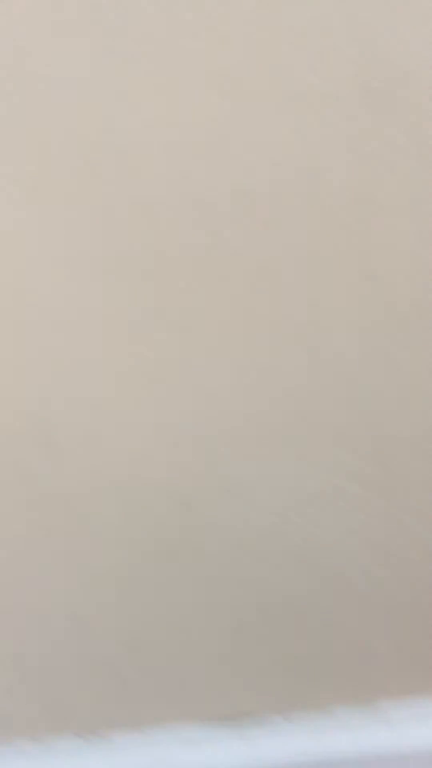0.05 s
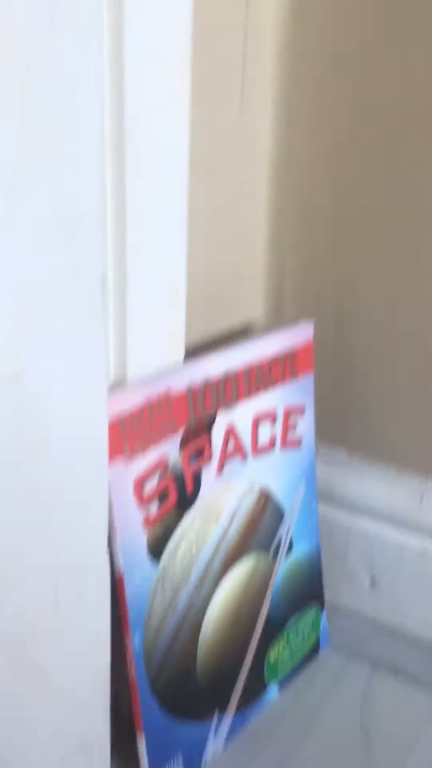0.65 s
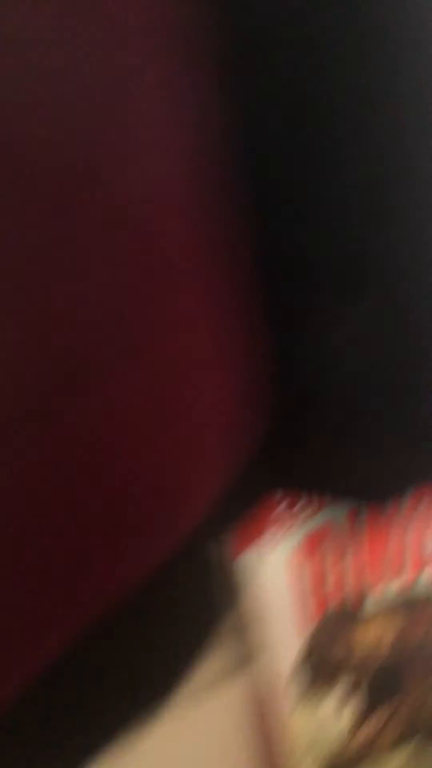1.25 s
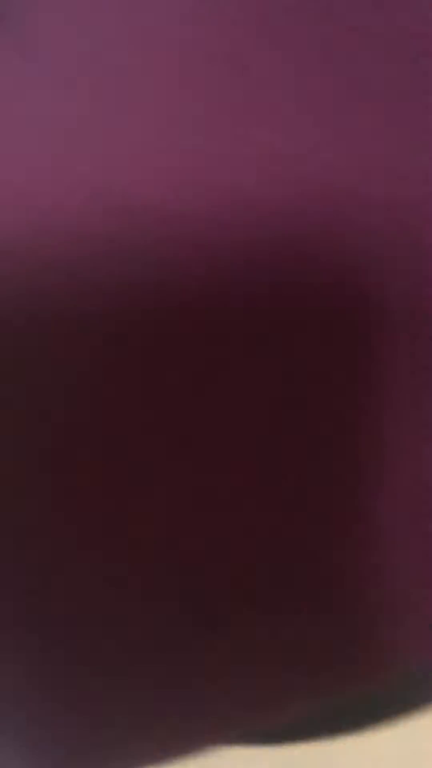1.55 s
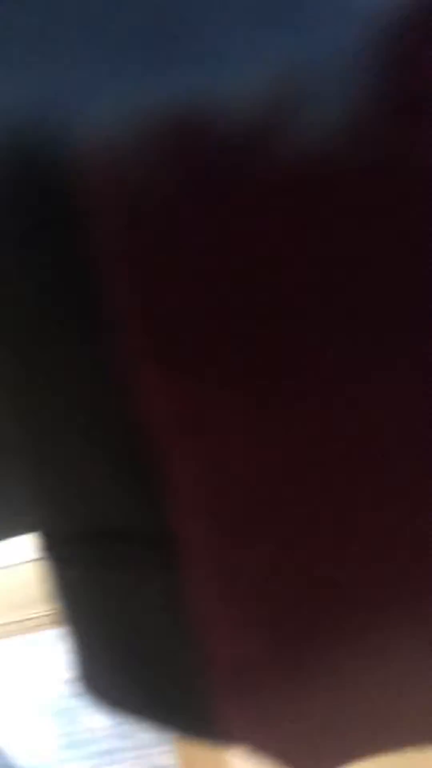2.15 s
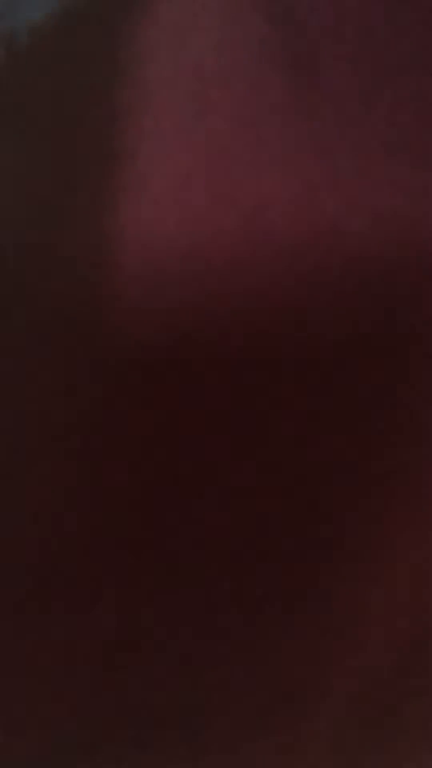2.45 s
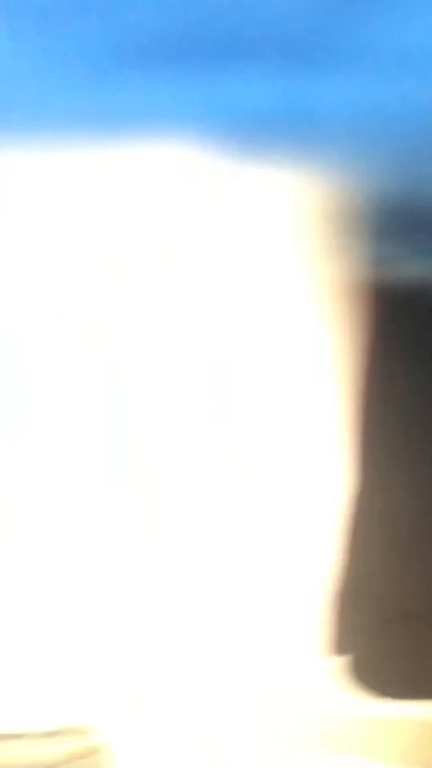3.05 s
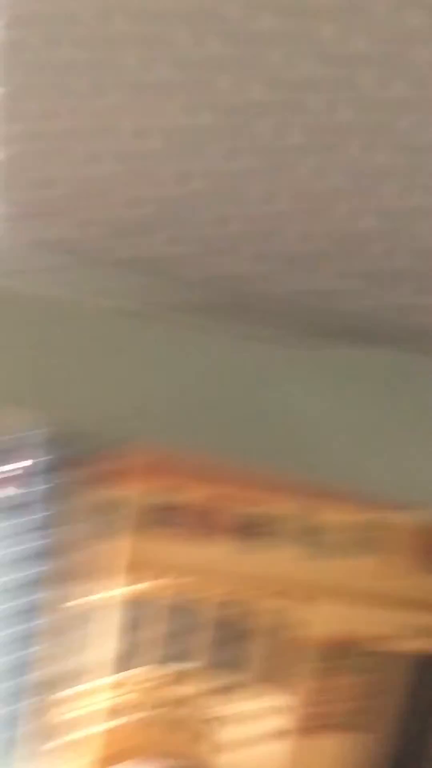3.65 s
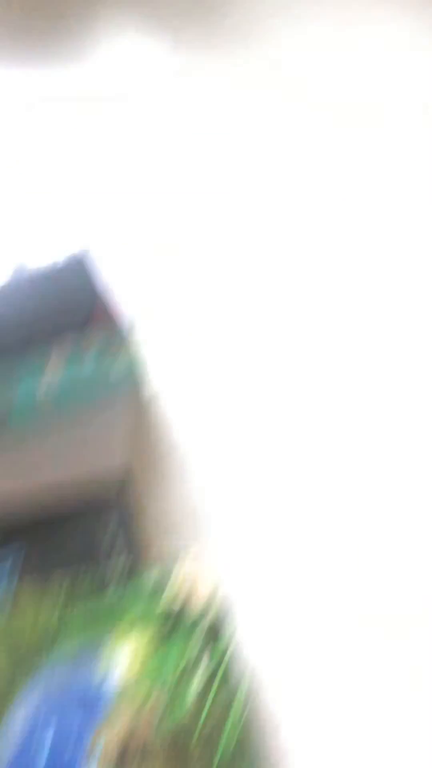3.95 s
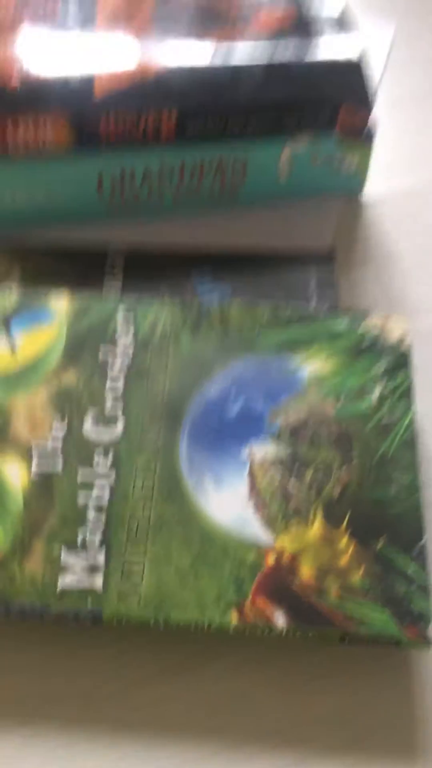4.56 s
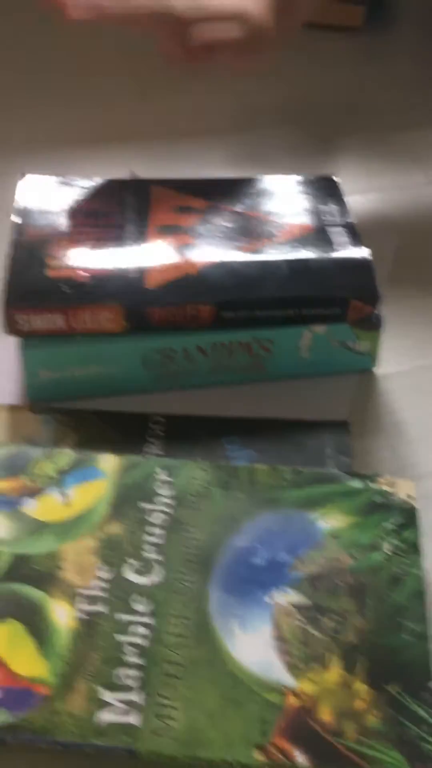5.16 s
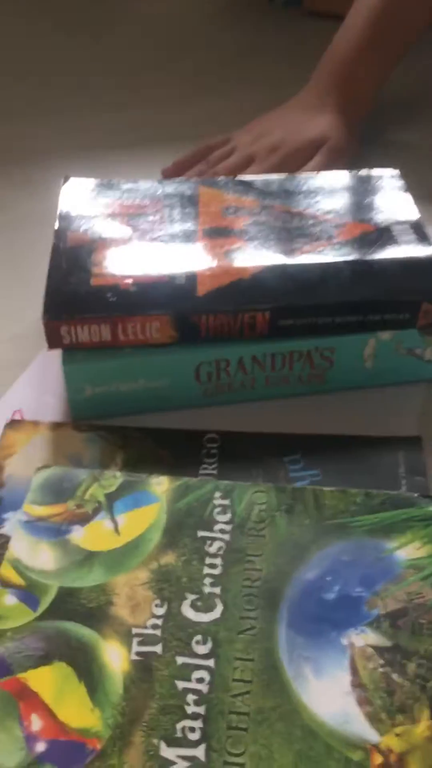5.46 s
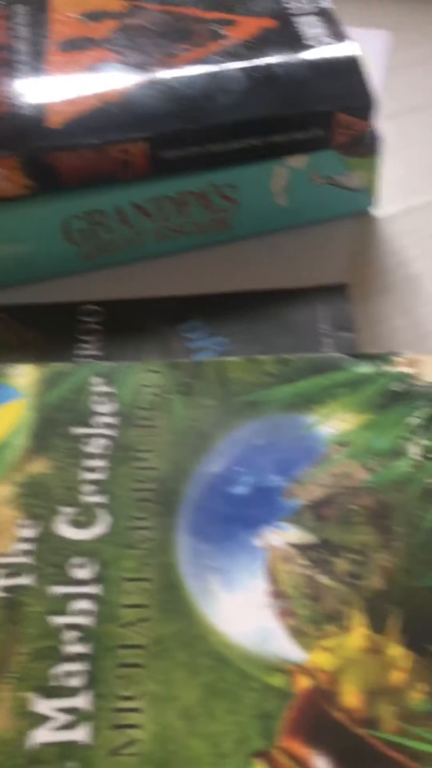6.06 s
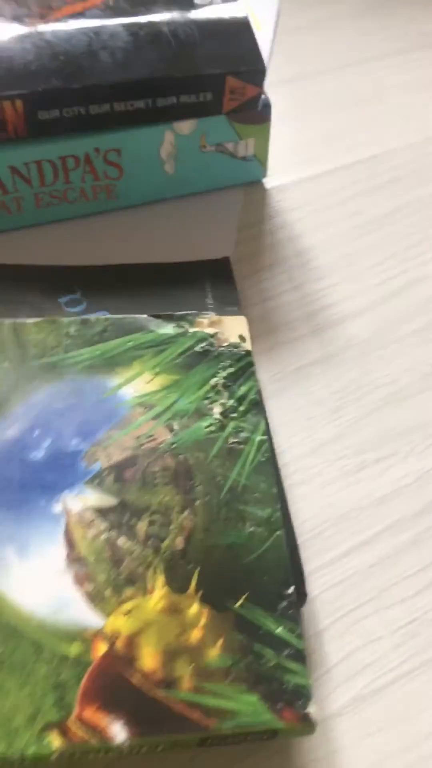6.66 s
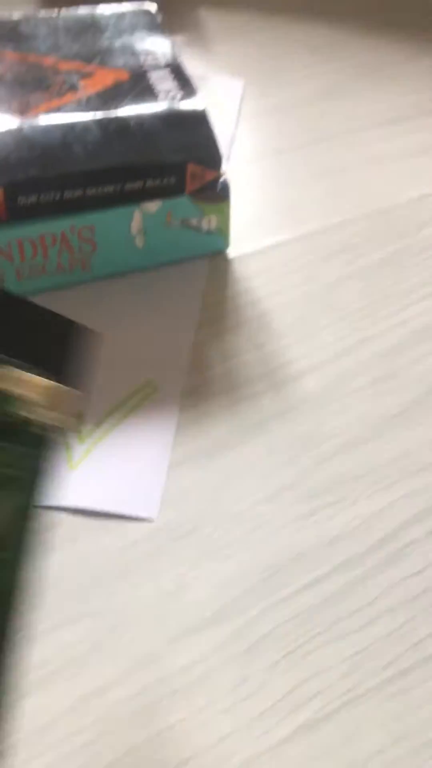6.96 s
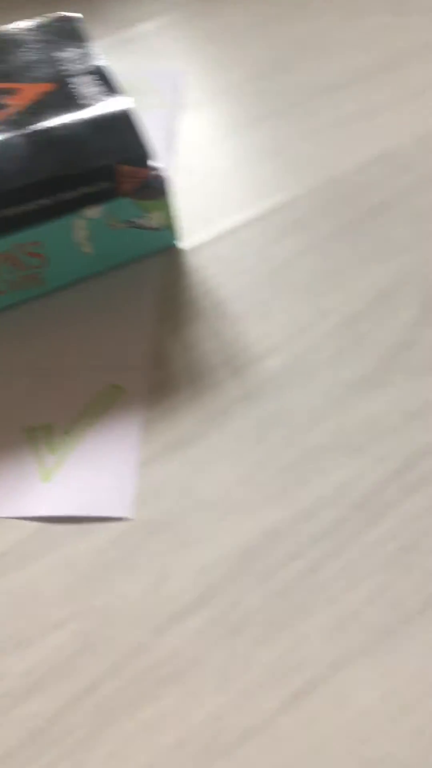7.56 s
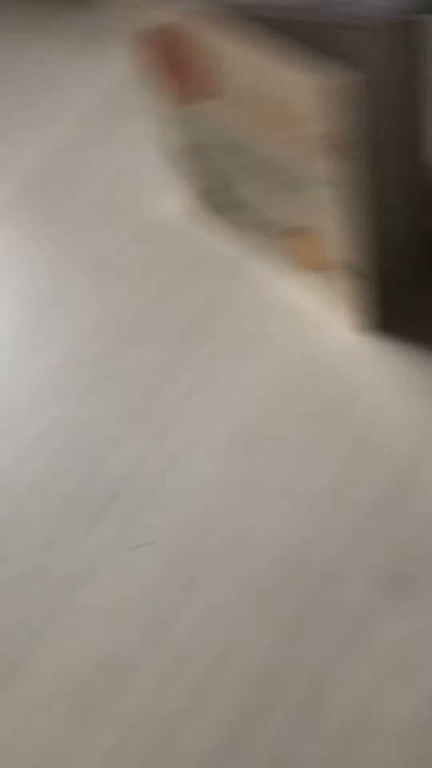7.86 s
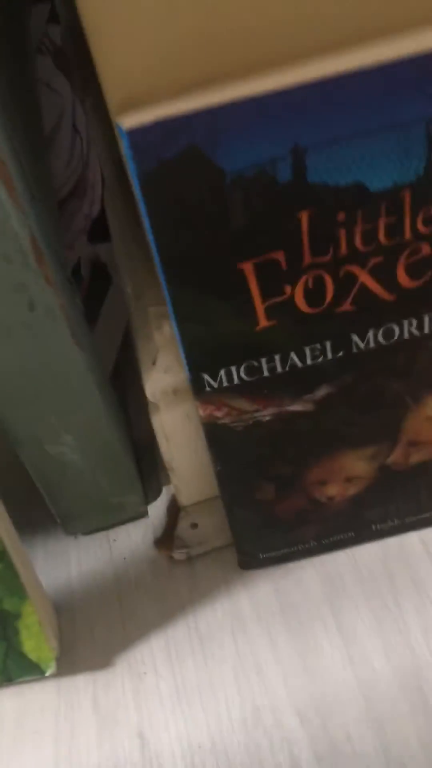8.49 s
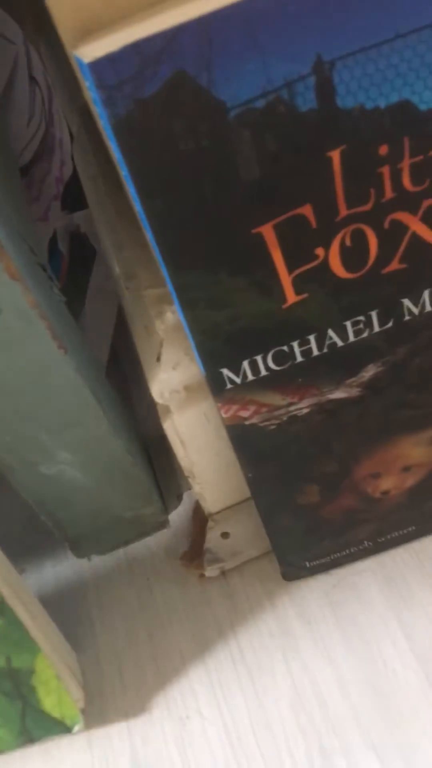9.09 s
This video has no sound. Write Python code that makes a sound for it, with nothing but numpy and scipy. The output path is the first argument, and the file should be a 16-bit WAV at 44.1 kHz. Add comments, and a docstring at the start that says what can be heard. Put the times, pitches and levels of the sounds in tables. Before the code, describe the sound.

Scattered soft thuds, knocks and ticks of someone walking about and moving paperbacks indoors, over faint rustling and handling rumble.

```python
"""Paperbacks in a small room

Someone walks about with a hand-held phone and handles paperbacks on the floor. Steps and bumps thud,
covers slap and tick, a fingertip squeaks by stick-slip. Close to the microphone, clothes rustle and the
hand rubs the case. The room answers briefly and booms in its low modes, over a faint hiss."""
import sys
import numpy as np
from scipy import signal
from scipy.fft import rfft, irfft, next_fast_len
from scipy.io import wavfile
from scipy.ndimage import uniform_filter1d, map_coordinates

SR = 44100
rng = np.random.default_rng(int(sys.argv[2]) if len(sys.argv) > 2 else 0)


def inscribe(sig):
    """Save sig as 16-bit PCM at rate SR to the path in sys.argv[1].

    A 1-D sig is mono; a 2-D sig holds one channel per row.
    Samples are clipped to [-1, 1] before scaling.
    """
    pcm = np.round(np.clip(np.atleast_2d(sig).T, -1, 1) * 32767)
    wavfile.write(sys.argv[1], SR, pcm.astype(np.int16))


N = 411453

# noise spectra (frequency [Hz], relative density [dB])
HISS_SPECTRUM = [(30, -1), (60, 4.5), (150, 7), (500, -36), (2000, -51), (8000, -42), (16000, -21)]
RUMBLE_SPECTRUM = [(13, -52), (22, -7), (42, -1.5), (60, 5.5), (119, -10), (150, -6.5), (193, -11.5),
                   (225, -7.5), (284, -14.5), (443, -26), (600, -20.5), (780, -29), (1320, -120)]
RUB_SPECTRUM = [(180, -57), (300, 2), (571, -2), (800, -2.5), (928, -1), (1030, -5), (2010, -7.5),
                (2810, -11.5), (3200, -9.5), (4160, -34), (7040, -120)]
CLOTH_SPECTRUM = [(1180, -46), (2000, -1.5), (2510, -3), (2740, -8), (3340, 0.5), (4450, 1.5), (4940, -2),
                  (6140, 1), (7840, -4.5), (9250, -2.5), (10300, -10), (11400, -6), (15100, -10.5),
                  (16000, -17)]
# grip rumble; arm and clothes motion (time [s], relative level [dB])
RUMBLE_ENVELOPE = [(0, -54.5), (.3, -59.5), (.48, -49), (.63, -49), (.7, -59.5), (1.08, -55), (1.58, -53.5),
                   (1.7, -58.5), (2.2, -60.5), (2.86, -62.5), (3.4, -56.5), (3.56, -50), (3.9, -49.5),
                   (4.1, -59), (4.75, -60.5), (4.95, -65), (5.6, -60), (6.5, -63), (6.7, -52), (6.85, -64),
                   (8.3, -62), (8.5, -57), (8.8, -64), (9.17, -50), (9.33, -59)]
MOTION_ENVELOPE = [(0, -69.5), (.16, -62.5), (.3, -64.5), (.43, -59), (.63, -68), (.68, -72.5), (.84, -73),
                   (.89, -65), (1.08, -57), (1.23, -66), (1.31, -63.5), (1.58, -64), (1.66, -72.5),
                   (1.84, -76), (2.2, -68), (2.34, -79), (2.5, -73), (2.86, -74.5), (3.05, -66),
                   (3.37, -73), (3.56, -61), (4.17, -63), (4.45, -71), (5.1, -75), (6.23, -75.5),
                   (6.41, -56.5), (6.55, -73), (6.7, -63.5), (6.83, -61.5), (6.94, -68.5), (7.11, -61.5),
                   (7.25, -66.5), (7.62, -62), (8.1, -62.5), (8.3, -69), (8.39, -61.5), (8.5, -71),
                   (9.05, -68), (9.33, -75)]
# phone case resonances (frequency [Hz], width [Hz], gain [ratio])
CASE_MODES = [(3620, 350, 0.11), (5950, 18, 0.45), (6630, 37, 0.21), (7000, 98, 0.13), (9760, 60, 0.17)]
# steps and books landing, levels relative (time [s], thud [dB], thud pitch [Hz], boom [dB], crack [dB],
# brightness [dB/octave], clack [dB], room [dB])
IMPACTS = [(0.039, -39.5, 183, -65, -71, -8, 0, 1.5), (0.066, -39, 440, -63, -68, -7, 9, 0.5),
           (.495, -10, 170, -24.5, -32, -7, 9, -13), (.5, -13.5, 307, -55, -45, -4, -2, -8),
           (.536, -20.5, 181, -27.5, -70, -6, -1, -6.5), (1.714, -46, 248, -46.5, -68.5, -23, -5.5, -2.5),
           (1.868, -41, 233, -40, -51, -8, -10, 4), (1.873, -22, 654, -69, -39, -5, 6.5, -4),
           (1.986, -30, 214, -37, -40, 2.6, -0.5, -3.5), (2.25, -46.5, 249, -45.5, -65.5, -3, -1, -5.5),
           (2.395, -49, 318, -68, -59.5, -3.5, -2.5, -5.5), (2.521, -48, 194, -71.5, -67.5, -2.5, 0, -0.5),
           (3.18, -31, 192, -51, -46.5, -7.5, 0.5, -1), (3.25, -34, 189, -40, -55.5, 0, -0.5, 0.5),
           (3.397, -38, 210, -70, -61, 1.9, -5, -8.5), (3.734, -42, 235, -63, -57, -0.7, 1.5, -17),
           (3.801, -28, 218, -36, -55.5, -2, 0, -3), (3.858, -39, 200, -62, -63.5, -8, -4, -24),
           (3.901, -41, 224, -58, -63, -8, 0, -15), (3.992, -31, 164, -67, -56.5, 0.5, -7, -9.5),
           (4.203, -29, 254, -62, -55.5, -4, 0.5, -4), (4.535, -27, 290, -59, -54, -0.5, -1, -5.5),
           (4.549, -24.5, 244, -43, -51, -0.3, -2, -7.5), (4.691, -46.5, 262, -59, -74, 1, -7, -4.5),
           (5.249, -25.5, 274, -33, -36.5, 0, 2.5, -2.5), (5.254, -24.5, 500, -58, -56.5, -4, -2, -2),
           (5.472, -38.5, 243, -68, -75, -6, -7.5, -16), (6.255, -38.5, 303, -72, -57, -2.5, -4.5, -10.5),
           (6.262, -34, 253, -58, -58, -2.5, -4, -9), (6.306, -34.5, 203, -53, -48, -1.8, 1, -13.5),
           (6.334, -35.5, 375, -70, -61, -8, 3, -22), (6.344, -31.5, 292, -65, -49.5, -3, -3, -9),
           (6.433, -32.5, 244, -78, -53.5, -0.5, 3, -15.5), (6.593, -32, 354, -68, -40, -1.6, 11, -15),
           (6.797, -25.5, 353, -50, -45.5, -4, -6, -10.5), (7.424, -13, 233, -35, -40, -11.5, 0, -10),
           (7.509, -35.5, 534, -65, -68, 1.5, -10, -16), (7.649, -42, 530, -75, -82, -3.5, -11, -10),
           (7.693, -42, 520, -67, -52, 1.6, 2.5, -11.5), (7.749, -55, 490, -74, -51.5, -2.2, 2, -7),
           (7.781, -43.5, 266, -62, -73, 5, -4, 3), (8.892, -18, 199, -45, -55.5, -7.5, 0, -6.5),
           (8.987, -37, 159, -73, -62, -6, 6, -0.5), (9.245, -32.5, 198, -66, -57.5, -1.5, -3.5, -3.5),
           (9.256, -29.5, 255, -63, -64, 1.5, -4.5, -8)]
# covers and page edges, no thud (time [s], crack [dB], brightness [dB/octave], clack [dB], room [dB])
COVER_TICKS = [(0.089, -59.5, -3.5, 2, -10), (0.504, -42, -2.5, 0.5, -13), (1.263, -62, -0.5, 0, -6.5),
               (1.982, -48.5, -4.5, 1, 2), (3.275, -54.5, -6, -3, 2.5), (3.33, -67, 2, 5, -7.5),
               (4.375, -61, 1, 1.5, -8), (4.955, -70, 4.5, -3, -12.5), (5.184, -68, -4.5, -5, 3.5),
               (5.246, -46.5, -4, -12.5, -4), (5.927, -76, 2.5, 3, -6.5), (6.455, -51, 1.3, 1.5, -5.5),
               (7.034, -64.5, -3.5, -2, -10), (7.084, -65.5, 0.5, 3, -5), (7.415, -41, -3.5, 2, -4),
               (8.167, -52, 0, -1, -10.5)]
# modes of floor and room; of boards and covers (frequency [Hz], t60 [s], relative level [dB])
BOOM_MODES = [(63.8, 0.45, -3), (76.6, 0.13, 4), (107.6, 0.33, -5), (171, .28, -6)]
BOARD_MODES = [(350,.12,-10), (533,0.19,-3), (647,0.34,-9.5), (730,0.33,-7), (1770,0.084,-14.5),
               (2160,0.15,-7.5)]
# room tail decay (frequency [Hz], t60 [s])
ROOM_DECAY = [(100, 0.46), (300, 0.28), (1000, 0.24), (3000, 0.26), (7000, 0.3), (14000, 0.23)]
# colour of a plain crack; of the microphone port (frequency [Hz], gain [dB])
CRACK_SPECTRUM = [(60, 28.5), (330, 43.5), (715, 45), (1480, 36), (3440, 37), (5200, 34.5), (8500, 30),
                  (16000, 28.5)]
PORT_RESPONSE = [(330,6), (450,1.5), (750,-0.5), (1050,0), (1800,2), (2300,0), (2850,-3.5), (3700,2),
                 (5200,-1.5), (7000,-0.5), (9900,-1.5), (10500,-6.5), (11600,-3.5), (15000,-9)]
# sleeve, finger and cover strokes (midpoint [s], nominal length [s], centre [Hz], sigma [octaves],
# level [dB])
STROKES = [(0.348,0.13,4400,0.41,-61), (0.45,0.019,1880,0.65,-51), (1.098,0.19,4740,0.4,-63.5),
           (1.418,0.035,10500,.3,-67), (1.558,.09,8500,.35,-68.5), (2.521,0.081,5200,0.48,-69.5),
           (3.042,0.26,4960,0.37,-70.5), (3.562,0.29,4850,0.44,-62.5), (8.217,0.049,6000,0.42,-63),
           (3.762,0.19,1330,0.37,-60), (6.005,0.065,7660,0.52,-69), (6.419,0.16,2410,0.94,-55),
           (6.443,.02,1860,0.81,-40), (6.615,.025,2940,.9,-55.5), (7.149,.07,930,0.14,-60),
           (7.842,.1,885,0.54,-60), (8.658,0.14,3590,0.76,-63.5), (8.721,0.32,1390,0.32,-69)]
# fingertip stick-slip (time [s], slip rate [Hz], level [dB])
FINGER_SLIPS = [(6.84, 390, -68), (6.862, 325, -45.5), (6.876, 400, -47.5), (6.884, 410, -50),
                (6.895, 365, -46), (6.908, 195, -50), (6.92, 120, -53)]

TOP_HZ = 16000


def amp(db):
    """Decibels to gain."""
    return 10 ** (np.asarray(db) / 20)


def unit(x):
    """Scale to rms 1."""
    return x / np.sqrt(np.mean(x ** 2) + 1e-20)


def along(points, hz):
    """Read (frequency, value) points on a log axis."""
    knots_hz, values = np.transpose(points)
    return np.interp(np.log(hz + 1), np.log(knots_hz + 1), values)


def curves(rows):
    """One per-sample curve for each column after time."""
    times_s, *columns = np.transpose(rows)
    return [np.interp(np.arange(N) / SR, times_s, column) for column in columns]


def wobble(rate_hz):
    """Smooth random curve, rate_hz knots a second."""
    knots = rng.standard_normal(int(N * rate_hz / SR) + 4)
    return map_coordinates(knots, [np.arange(N) * rate_hz / SR])


def filtered(x, response):
    """Apply a frequency response."""
    size = next_fast_len(len(x) + 8192)
    return irfft(rfft(x, size) * response(np.fft.rfftfreq(size, 1 / SR)), size)[:len(x)]


def minimum_phase(points, size=2048):
    """Causal impulse response of (frequency [Hz], gain [dB]) points."""
    cepstrum = irfft(np.log(amp(along(points, np.fft.rfftfreq(size, 1 / SR)))))
    cepstrum[1:size // 2] *= 2
    cepstrum[size // 2 + 1:] = 0
    return irfft(np.exp(rfft(cepstrum)))


def add(track, time_s, sound):
    """Mix a sound into the track."""
    start = max(round(time_s * SR), 0)
    track[start:start + len(sound)] += sound[:N - start]


def hiss():
    """Steady room background: low noise under a faint hiss."""
    return amp(-72) * unit(filtered(rng.standard_normal(N), lambda hz: amp(along(HISS_SPECTRUM, hz))))


def friction(spectrum, grain_db, grain_hz):
    """Fibres catch and let go: clumped noise, rms 1."""
    catches = rng.standard_normal(N) * amp(grain_db * wobble(grain_hz))
    return unit(filtered(catches, lambda hz: amp(along(spectrum, hz))))


def grip_rumble():
    """The grip on the phone rumbles unevenly."""
    level_db, = curves(RUMBLE_ENVELOPE)
    return amp(level_db + 1.5) * friction(RUMBLE_SPECTRUM, grain_db=2.5, grain_hz=16)


def hand_rub(motion_db):
    """The hand rubs the case, louder as the arm moves."""
    level_db = -66.5 + 0.94 * (motion_db - motion_db.mean())
    return amp(level_db + 0.3 * wobble(25)) * friction(RUB_SPECTRUM, grain_db=2.5, grain_hz=440)


def cloth_rustle(motion_db, snags_per_s=22, spread_db=22, snag_decay_s=0.0027):
    """Sleeves swish with the motion; single fibres snag and snap free."""
    swish = friction(CLOTH_SPECTRUM, grain_db=0, grain_hz=800)
    snaps = (rng.random(N) < snags_per_s / SR) * amp(spread_db * rng.random(N))
    decay = np.exp(-np.arange(SR // 100) / SR / snag_decay_s)
    scratch = friction(CLOTH_SPECTRUM, grain_db=0.5, grain_hz=620)
    snags = unit(signal.fftconvolve(snaps, decay)[:N] * scratch)
    return amp(motion_db + 1.2 * wobble(35)) * (swish + amp(-10) * snags)


def phone_case(x, echo_gain=0.23):
    """A shifting reflection off the moving hand and the case resonances colour the rubbing."""
    delay_s = 0.000716 * np.exp(0.353 * wobble(5))
    echo = np.interp(np.arange(N) - delay_s * SR, np.arange(N), x)
    combed = (x + echo_gain * echo) / np.hypot(1, echo_gain)
    return filtered(combed, lambda hz: 1 + sum(
        gain * 1j * hz * width_hz / (mode_hz ** 2 - hz ** 2 + 1j * hz * width_hz)
        for mode_hz, width_hz, gain in CASE_MODES))


def room(x, early_t60_s, late_db, gap_s):
    """Quick reflections off near walls, then a weaker tail; drawn afresh per call."""
    t = np.arange(SR // 2) / SR
    hz, frames_s, noise = signal.stft(rng.standard_normal(len(t)), SR, nperseg=256)
    early = amp(-60 * frames_s / early_t60_s)
    late = amp(late_db - 60 * frames_s / along(ROOM_DECAY, hz)[:, None])
    response = signal.istft(noise * (early + late), SR, nperseg=256)[1][:len(t)]
    response *= 1 - np.exp(-(t / gap_s) ** 4)
    return signal.fftconvolve(x, response / np.linalg.norm(response))


def thud(level_db, pitch_hz, boom_db, room_db, swell_cycles=1.084, boom_rise_s=0.0033):
    """A soft, heavy contact swings the boards for a few cycles and sets the room booming."""
    t = np.arange(SR // 2) / SR
    swell = t[:SR // 8] * pitch_hz / swell_cycles
    envelope = (swell * np.exp(1 - swell)) ** 2.36
    sag = 1 + 0.25 * (np.exp(-swell) - 0.4)  # pitch sinks as the contact spreads
    push = amp(level_db - 0.5) * envelope * np.sin(2 * np.pi * np.cumsum(pitch_hz * sag) / SR)
    out = amp(room_db) * room(push, early_t60_s=0.048, late_db=-14, gap_s=0.008)
    add(out, 0, push)
    boom = sum(amp(mode_db + rng.normal(0, 0.99) - 60 * t / t60_s) * np.sin(2 * np.pi * hz * t)
               for hz, t60_s, mode_db in BOOM_MODES)
    add(out, 0, amp(boom_db) * boom * (1 - np.exp(-t / boom_rise_s)))
    return out


def thuds(lead_s=0.0014):
    """The weight of each step or book, just ahead of its crack."""
    out = np.zeros(N)
    for time_s, level_db, pitch_hz, boom_db, *_, room_db in IMPACTS:
        add(out, time_s - lead_s, thud(level_db, pitch_hz, boom_db, room_db))
    return out


def volley(contact_s, lead_s, scuff_db):
    """An edge grazes for lead_s, then lands in tiny pitchless impacts; energy 1."""
    t = np.arange(SR // 20) / SR - lead_s
    swell = np.maximum(t, 0) / contact_s
    envelope = swell * np.exp(1 - swell) + amp(scuff_db) * np.exp(-np.abs(t) / (2.2 * contact_s))
    spectrum = rfft(rng.standard_normal(len(t)) * envelope)
    smooth_power = np.abs(uniform_filter1d(np.abs(spectrum) ** 2, size=33))
    whitened = irfft(spectrum / np.sqrt(smooth_power))
    return whitened / np.linalg.norm(whitened)


def crack_colour(level_db, tilt_db_per_oct, clack_db, pivot_hz=1440, clack_hz=3100, sigma_oct=0.65):
    """Hard surfaces tilt the crack to the treble; stiff covers clack in a band that rises with tilt."""
    hz = np.geomspace(50, TOP_HZ, 60)
    tilt_db = tilt_db_per_oct * np.log2(np.clip(hz, 940, 8500) / pivot_hz)
    offset_oct = np.log2(hz / clack_hz) - 0.095 * tilt_db_per_oct
    clack_band = np.exp(-0.5 * (offset_oct / sigma_oct) ** 2)
    gain_db = level_db + along(CRACK_SPECTRUM, hz) + tilt_db + clack_db * clack_band
    return minimum_phase(np.transpose([hz, gain_db]))


def cracks(lead_s=0.008):
    """Steps, covers and page edges land as short volleys, ring the boards and pass the microphone port."""
    out = np.zeros(N)
    t = np.arange(SR // 5) / SR
    ring = sum(amp(db - 60 * t / t60_s) * np.cos(2 * np.pi * hz * t) * 2 * np.log(1000) / (t60_s * SR)
               for hz, t60_s, db in BOARD_MODES)
    hits = [(row[0], *row[4:]) for row in IMPACTS] + COVER_TICKS
    for time_s, level_db, tilt_db_per_oct, clack_db, room_db in hits:
        colour = crack_colour(level_db, tilt_db_per_oct, clack_db)
        # blows out in the room last longer and ring more than close ones
        contact_s = 0.0024 * amp(0.5 * room_db)
        ring_db = 11.5 + 0.99 * room_db
        blow = signal.fftconvolve(volley(contact_s, lead_s, scuff_db=-20), colour)
        start_s = time_s - lead_s - 0.0005
        add(out, start_s, blow)
        add(out, start_s, amp(ring_db) * signal.fftconvolve(blow, ring))
        # walls gather sound from all directions: even colour
        reflections = room(colour, early_t60_s=0.087, late_db=-5.5, gap_s=0.0069)
        add(out, time_s + contact_s, amp(room_db - 1.5) * reflections)
    return signal.fftconvolve(out, minimum_phase(PORT_RESPONSE))[:N]


def brush_strokes(catch_db=2, catch_hz=140):
    """Strokes swell and fade in a band set by surface and speed, catching unevenly."""
    out = np.zeros(N)
    for middle_s, length_s, centre_hz, sigma_oct, level_db in STROKES:
        envelope = signal.windows.tukey(round(1.5 * length_s * SR), 0.7)
        band = lambda hz: np.exp(-0.5 * (np.log2((hz + 1) / centre_hz) / sigma_oct) ** 2)
        noise = unit(filtered(rng.standard_normal(len(envelope)), band))
        add(out, middle_s - len(envelope) / SR / 2, amp(level_db) * envelope * noise)
    return out * amp(catch_db * wobble(catch_hz))


def finger_squeak():
    """Skin slips over a glossy surface in uneven jerks, each with a little scrape."""
    slip_hz, level_db = curves(FINGER_SLIPS)
    t = np.arange(N) / SR
    jitter = 1 + 0.14 * wobble(350)
    phase = 2 * np.pi * np.cumsum(slip_hz * jitter) / SR
    slips = sum(amp(-9 * k) * np.sin((k + 1) * phase) for k in range(5))
    scrape = amp(-13) * (1 + np.cos(phase)) * friction(RUB_SPECTRUM, grain_db=1, grain_hz=300)
    touching = (t > FINGER_SLIPS[0][0]) & (t < FINGER_SLIPS[-1][0])
    return (slips + scrape) * amp(level_db + 2.3 * wobble(150)) * touching


def scene():
    """All sources at one microphone; one motion drives rub and rustle."""
    motion_db, = curves(MOTION_ENVELOPE)
    contacts = thuds() + cracks() + finger_squeak()
    rumble = grip_rumble()
    rubbing = phone_case(hand_rub(motion_db) + cloth_rustle(motion_db) + brush_strokes())
    return (contacts + rumble + rubbing + hiss())[None]


def record(dry):
    """The phone cuts the deepest bass and everything above TOP_HZ."""
    bass_cut = signal.butter(2, 30, "high", fs=SR, output="sos")
    return np.array([filtered(signal.sosfilt(bass_cut, x), lambda hz: hz < TOP_HZ) for x in dry])


dry = scene()
out = record(dry)
inscribe(out)
```